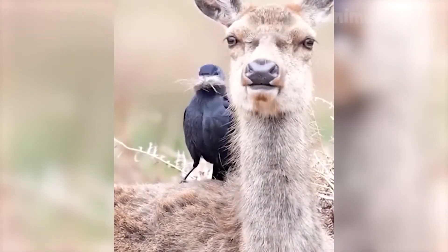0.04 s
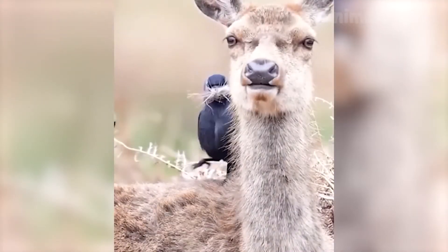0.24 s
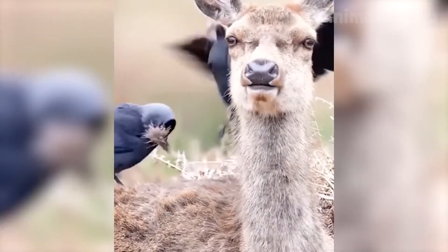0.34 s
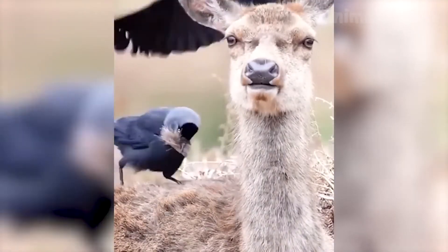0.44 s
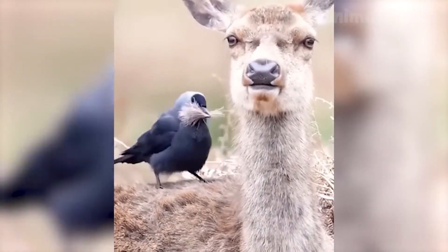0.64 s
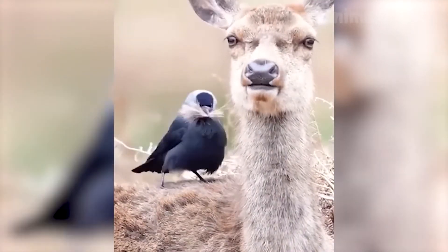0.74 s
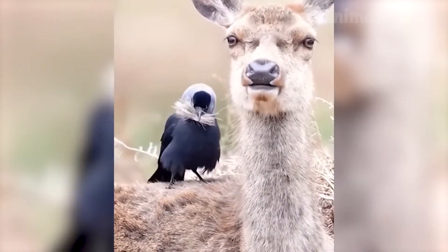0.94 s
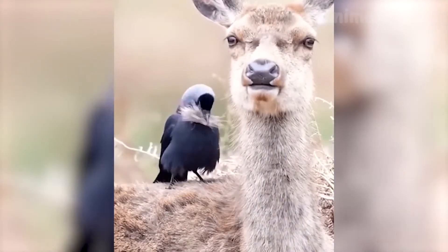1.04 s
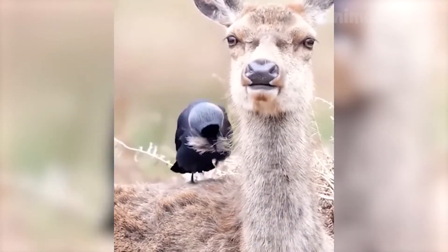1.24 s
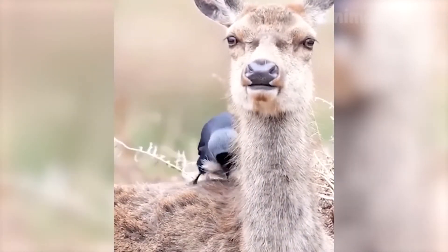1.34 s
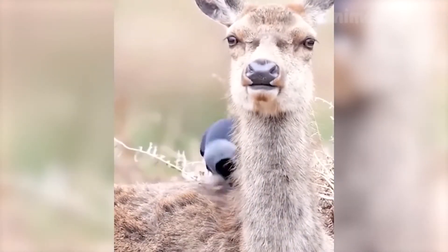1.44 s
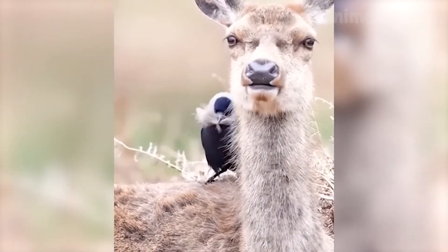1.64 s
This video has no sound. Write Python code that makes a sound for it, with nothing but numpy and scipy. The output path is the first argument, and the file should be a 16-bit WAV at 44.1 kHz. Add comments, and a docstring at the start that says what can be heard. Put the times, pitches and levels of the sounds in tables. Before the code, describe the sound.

Outdoors in an open, nearly echo-free place, one high, broken jackdaw call sounds near the microphone early on, followed by scattered weak gliding chirps farther away, a faint dull tap and low distant background noise.

```python
"""Outdoors: a low, distant wash of shaped noise runs throughout, with wind bumping softly on the microphone.
At about 0.2 s a jackdaw close by gives one short, shrill, broken call: throbbing near-sines make the whistles,
pulses and air noise ringing gliding resonances make the rasp and hiss, and a louder whistle ends it at 0.32 s.
From 0.45 to 1 s fainter ringing chirps come from farther off, with a faint dull tap at 0.69 s.
A trace of distant birds rises towards the end at 1.7 s."""
import sys
import numpy as np
from scipy import signal
from scipy.fft import rfft, irfft
from scipy.io import wavfile
from scipy.ndimage import uniform_filter1d

SR = 44100
rng = np.random.default_rng(int(sys.argv[2]) if len(sys.argv) > 2 else 0)


def persist_wave(psi):
    """Save psi, clipped to +-1, as 16-bit WAV."""
    counts = np.round(np.clip(psi, -1, 1) * 32767).astype(np.int16)
    wavfile.write(sys.argv[1], SR, np.atleast_2d(counts).T)


N = 74970  # samples, 1.7 s

# In event tables the time is the loudest moment, and a gliding pitch passes through its value then.

# spectrum of the distant wash: (frequency [Hz], relative level per Hz [dB])
WASH_SPECTRUM = [(15, 2), (40, -5), (62, -23), (90, -25), (140, -8.5), (220, -8), (300, -4), (400, -8.5),
                 (620, -2.5), (790, -6), (1050, -18), (1800, -21.5), (3300, -23), (6000, -29.5),
                 (9000, -30.5), (12000, -32.5), (14000, -39.5), (15500, -51)]
WASH_DB, WASH_PATCH_DB = -56, 1.5  # rms level, rms unevenness of the patches

# wind bumps on the microphone: (time [s], rise [s], fall [s], pitch [Hz], level [dB])
WIND_BUMPS = [(.025, 0.015, 0.027, 122, -51), (.172, 0.019, 0.025, 110, -51.5), (.21, 0.2, 0.12, 37.8, -56),
              (.49, 0.056, 0.021, 45.6, -62.5), (.65, 0.044, 0.038, 41.7, -61),
              (1.03, 0.042, 0.042, 35, -56.5), (1.134, 0.024, 0.023, 133, -53),
              (1.17, 0.069, 0.057, 38, -59.5), (1.597, 0.033, 0.039, 130, -64)]

# The next four tables share these columns:
# (time [s], rise [s], fall [s], resonance [Hz], glide [Hz/s], width [Hz], level [dB])
# one faint dull tap
DULL_TAP = (.688, .010, .015, 800, 0, 350, -54)
# a trace of distant birds
DISTANT_BIRDS = (1.7, 0.72, .2, 3352.5, 2.5, 700, -74)
# chirps from farther off
FAR_CHIRPS = [(0.455, 0.019, 0.025, 5576, -10000, 913, -42.5), (0.46, .02, 0.03, 4420, -3, 2500, -54),
              (.485, .015, 0.017, 6940, 0, 871, -60), (0.502, 0.017, 0.025, 4160, 7998, 1500, -48.5),
              (.505, 0.016, .020, 7160, 10000, 1840, -53.5), (.607, .025, 0.033, 4700, -5000, 1190, -68),
              (.651, 0.038, 0.038, 6480, 6002.5, 330, -68), (.805, .019, 0.023, 7560, 0, 950, -52.5),
              (.854, 0.022, .026, 5400, -10000, 820, -44.5),
              (0.883, 0.033, 0.039, 5200, -9000, 1200, -53.5), (.934, 0.14, 0.054, 4710, -3000, 1700, -58),
              (.994, 0.032, 0.035, 6610, -2.5, 445, -71)]
CHIRP_OVERTONE_DB = -32.5  # octave above, relative to the chirp
# low undertone of the close call, which bypasses the beak
CALL_UNDERTONES = [(.221, 0.034, 0.0097, 1206, 12003, 300, -55), (.318, .014, 0.018, 915, 1.5, 280, -47.5)]

# rough parts of the close call, level ahead of the beak:
# (time [s], rise [s], fall [s], resonance [Hz], glide [Hz/s], width [Hz], level [dB])
CALL_RASPS = [(.178, 0.013, 0.025, 7360, -12.5, 1200, -34), (.207, 0.013, 0.034, 4220, 6, 700, -36.5),
              (.208, 0.029, 0.019, 7600, 6, 1520, -54), (0.242, 0.017, 0.022, 3944, 5998.5, 900, -22),
              (.264, .010, 0.01818, 3793, -7, 1088, -32), (.254, .026, 0.044, 6940, -1.5, 2030, -39.5),
              (0.282, 0.011, 0.029, 5200, 19998.5, 2330, -29.5),
              (0.2839, .004, 0.0109, 7245, -0.5, 2400, -20.5),
              (.292, 0.0074, 0.0103, 7686, -9.5, 1890, -19.5), (.321, 0.02, .015, 7334, -6, 1500, -29),
              (0.323, 0.016, 0.00702, 4054, 80000, 1000, -29.5)]
RASP_PER_S, RASP_JITTER = 440, .3  # mean pulse rate [1/s], its rms unevenness [fraction]
RASP_NOISE = .7  # air noise relative to the pulses, gain

# clear notes of the close call, level ahead of the beak:
# (time [s], rise [s], fall [s], pitch [Hz], glide [Hz/s], level [dB])
CALL_WHISTLES = [(.206, 0.012, 0.0088, 4920, 2, -24), (.214, .004, 0.0039, 4883, -1, -18.5),
                 (.222, .006, .007, 5040, 8002.5, -19), (.227, 0.016, .02, 3214, 0, -32.5),
                 (.312, 0.013, 0.0068, 4760, -2.5, -19.5), (.3240, 0.012, 0.011, 4840, 1, -11)]
THROB_PER_S, THROB_JITTER = 195, .3  # mean rate [1/s], its rms unevenness [fraction]
THROB_DEPTH, WOBBLE_HZ = .9, 50  # fraction of the amplitude, rms pitch wobble [Hz]

# colour of the close bird's throat and beak: (frequency [Hz], gain [dB])
BEAK_COLOUR = [(2000, -31.5), (2850, -14.5), (3130, 1.5), (5200, 0.5), (8650, -3), (9000, -23.5),
               (12000, -14), (15000, -11.5)]

# wide, weak noise that follows the call's loudness: (frequency [Hz], relative level per Hz [dB])
FRINGE_SPECTRUM = [(300, -19), (900, -3.5), (1600, -11.5), (2400, -7), (4000, 3.5), (8000, -2.5),
                   (9500, -20.5), (14000, -24.5), (15500, -37.5)]
FRINGE_DB, FRINGE_POWER = -39.5, .7  # rms level at the call's loudest, exponent on its loudness

BELL_SHAPE = 1.7  # 1 = pointed, 2 = round
ECHO_S, ECHO_DB = .027, -36  # one echo of the close call
NEAR_WET_DB, FAR_WET_DB, AIR_T60_S = -34, -13, .11  # sends to the open-air scatter, its decay by 60 dB
BIRD_SIDE_DB, WASH_SIDE_DB = -55.5, -71.5  # scatter sends for the left-right difference
EDGE_HZ = 15400  # upper limit of the recorder


def amp(db):
    """Decibels to gain."""
    return 10 ** (np.asarray(db) / 20)


def unit(x):
    """Scales to rms 1."""
    return x / np.sqrt(np.mean(abs(x) ** 2) + 1e-20)


def read(points, hz):
    """Reads a spectrum in dB along a log-frequency axis."""
    f, db = np.transpose(points)
    return np.interp(np.log(hz + 1), np.log(f + 1), db)


def colour(x, points):
    """Filters by a spectrum."""
    gain = amp(read(points, np.fft.rfftfreq(N, 1 / SR)))
    return irfft(rfft(x) * gain, N)


def smooth(x, hz):
    """Steep low-pass, 6 dB down at hz, scaled to rms 1."""
    gain = 1 / (1 + (np.fft.fftfreq(N, 1 / SR) / hz) ** 4)
    return unit(np.fft.ifft(np.fft.fft(x) * gain))


def drift(hz):
    """Random wander slower than about hz, rms 1."""
    return smooth(rng.standard_normal(N), hz).real


def uneven_beats(per_s, jitter):
    """Running count of beats whose rate wanders at random."""
    return np.cumsum(per_s * (1 + jitter * drift(per_s))) / SR


def swell(at, rise, fall):
    """A bell that is 20 dB down one rise before and one fall after its top."""
    t = np.arange(N) / SR - at
    steps = abs(t / np.where(t < 0, rise, fall)) ** BELL_SHAPE
    return amp(-20 * np.minimum(steps, 20))


def carrier(at, hz, glide):
    """Phase of a pitch that glides through hz at the given time."""
    t = np.arange(N) / SR - at
    return 2 * np.pi * (hz * t + glide * t ** 2 / 2)


def rasp(at, rise, fall, hz, glide, width_hz, db, overtone_db=-100):
    """Uneven pulses and air noise ring a gliding resonance."""
    beats = uneven_beats(RASP_PER_S, RASP_JITTER)
    pulses = np.diff(np.floor(beats), prepend=0) * np.exp(2j * np.pi * rng.random(N))
    air = rng.standard_normal(N) + 1j * rng.standard_normal(N)
    ring = smooth(unit(pulses) + RASP_NOISE * unit(air), width_hz / 2)
    # even out the loudness over 9 ms
    ring = ring / np.sqrt(uniform_filter1d(abs(ring) ** 2, size=400) + 1e-6)
    voice = ring * np.exp(1j * carrier(at, hz, glide))
    overtone = amp(overtone_db) * voice ** 2  # squaring doubles the pitch
    return amp(db) * swell(at, rise, fall) * unit(voice.real + overtone.real)


def distant_wash():
    """Shaped noise whose level drifts in soft patches of time and frequency."""
    _, _, z = signal.stft(rng.standard_normal(N), SR, nperseg=1024)
    patches = uniform_filter1d(rng.standard_normal(z.shape), size=12, axis=0)
    patches = unit(uniform_filter1d(patches, size=6, axis=1))
    _, patchy = signal.istft(z * amp(WASH_PATCH_DB * patches), SR, nperseg=1024)
    return amp(WASH_DB) * unit(colour(patchy[:N], WASH_SPECTRUM))


def wind_bump(at, rise, fall, hz, db):
    """Wind on the microphone: a brief low tone with wandering phase."""
    tone = np.cos(carrier(at, hz, 0) + drift(0.38 * hz))
    return amp(db) * swell(at, rise, fall) * unit(tone)


def background():
    """Distant wash, wind bumps, one dull tap and a trace of distant birds."""
    bumps = sum(wind_bump(*row) for row in WIND_BUMPS)
    return distant_wash() + bumps + rasp(*DULL_TAP) + rasp(*DISTANT_BIRDS)


def far_chirps():
    """Birds farther off: noisy gliding resonances with a weak octave above."""
    return sum(rasp(*row, overtone_db=CHIRP_OVERTONE_DB) for row in FAR_CHIRPS)


def whistle(at, rise, fall, hz, glide, db):
    """A near sine that wobbles in pitch and throbs unevenly."""
    beats = uneven_beats(THROB_PER_S, THROB_JITTER) + rng.random()
    throb = 1 - THROB_DEPTH * np.cos(np.pi * beats) ** 4
    wobble = 2 * np.pi * np.cumsum(WOBBLE_HZ * drift(2 * THROB_PER_S)) / SR
    tone = throb * np.cos(carrier(at, hz, glide) + wobble)
    return amp(db) * swell(at, rise, fall) * unit(tone)


def noisy_fringe(call):
    """Wide noise that rises and falls with the call, less steeply than it does."""
    loudness = np.sqrt(abs(uniform_filter1d(call ** 2, size=200)))
    follow = (loudness / loudness.max()) ** FRINGE_POWER
    return amp(FRINGE_DB) * follow * unit(colour(rng.standard_normal(N), FRINGE_SPECTRUM))


def close_call():
    """Whistles and rasps through the beak, with weak undertones and a faint noisy fringe."""
    whistles = sum(whistle(*row) for row in CALL_WHISTLES)
    call = whistles + sum(rasp(*row) for row in CALL_RASPS)
    undertones = sum(rasp(*row) for row in CALL_UNDERTONES)
    return colour(call, BEAK_COLOUR) + noisy_fringe(call) + undertones


def open_air(x):
    """A short scatter from ground and trees: decaying noise of unit energy."""
    t = np.arange(SR // 2) / SR
    tail = rng.standard_normal(len(t)) * np.exp(-np.log(1000) * t / AIR_T60_S)
    return signal.fftconvolve(x, tail / np.linalg.norm(tail))[:N]


def scene():
    """Near and far birds over the background, almost the same in both channels."""
    ground, far, near = background(), far_chirps(), close_call()
    echo = amp(ECHO_DB) * np.roll(near, round(ECHO_S * SR))
    scatter = open_air(amp(NEAR_WET_DB) * near + amp(FAR_WET_DB) * far)
    mid = ground + far + near + echo + scatter
    side = open_air(amp(BIRD_SIDE_DB) * (near + far) + amp(WASH_SIDE_DB) * ground)
    return np.array([mid + side, mid - side])


def record(dry):
    """The recorder's band limit: a steep low-pass."""
    low_pass = signal.firwin(511, EDGE_HZ, window=("kaiser", 9), fs=SR)
    return signal.oaconvolve(dry, low_pass[None], "same")


dry = scene()
out = record(dry)
persist_wave(out)
```